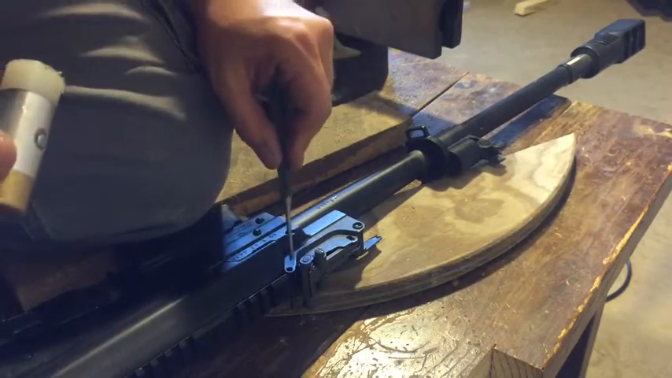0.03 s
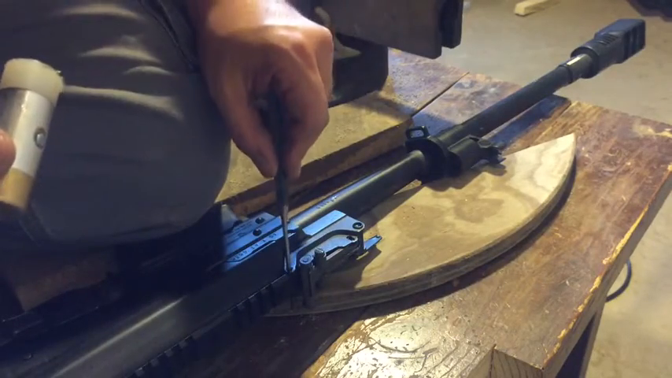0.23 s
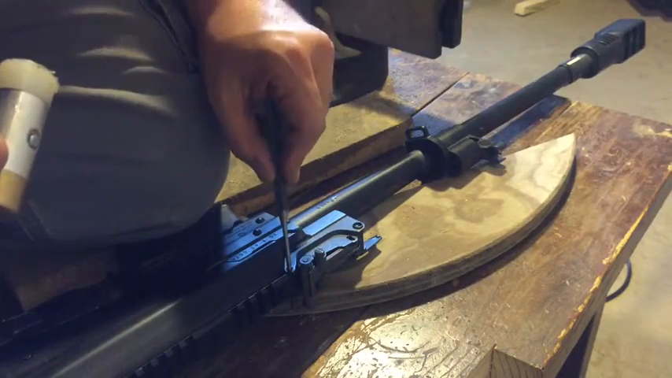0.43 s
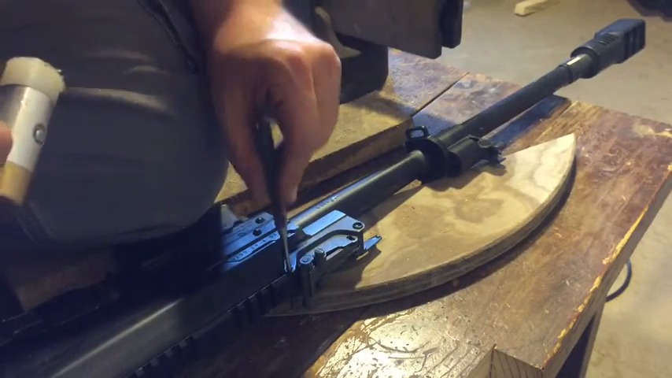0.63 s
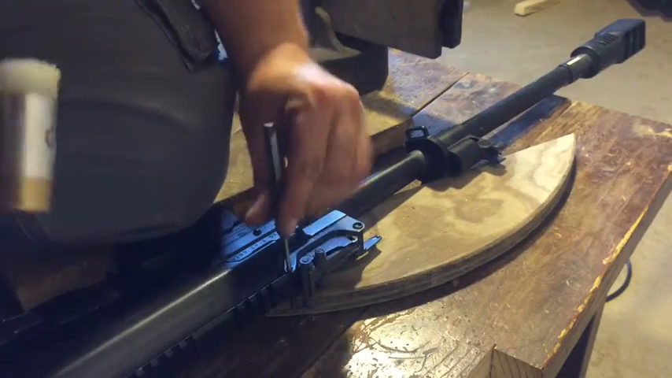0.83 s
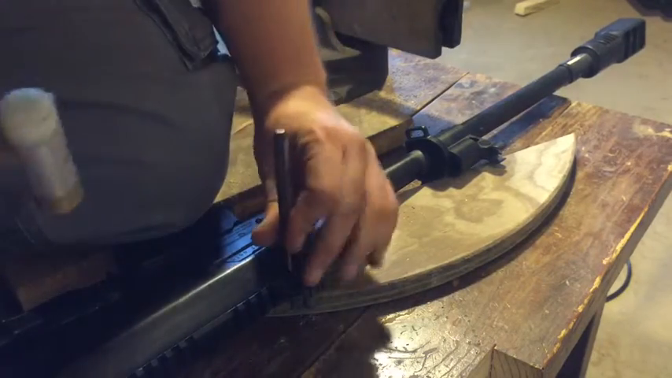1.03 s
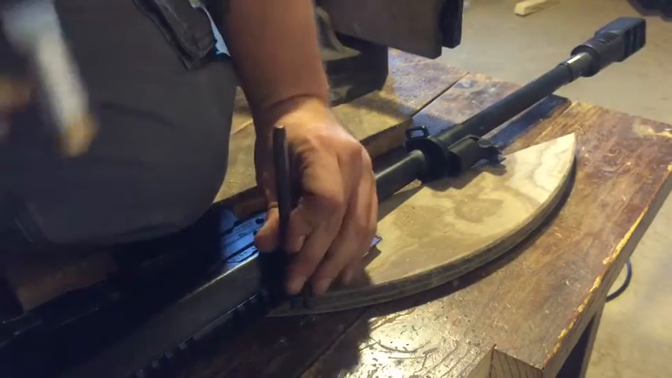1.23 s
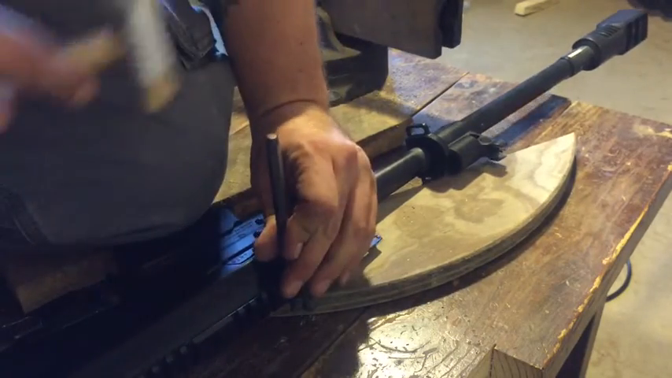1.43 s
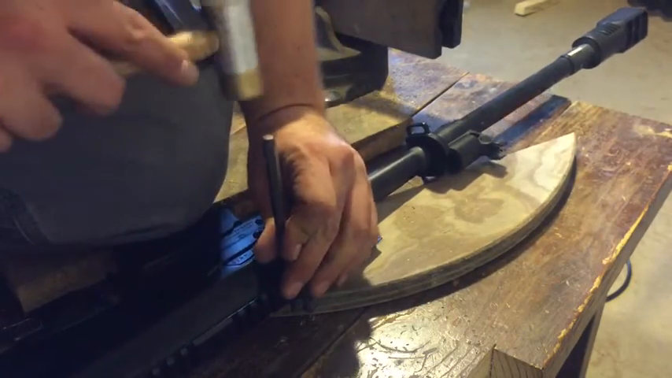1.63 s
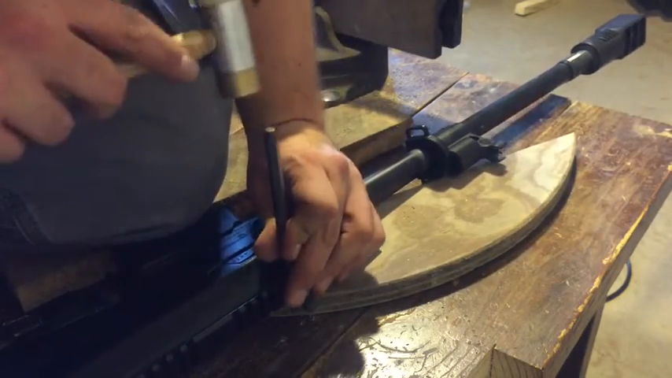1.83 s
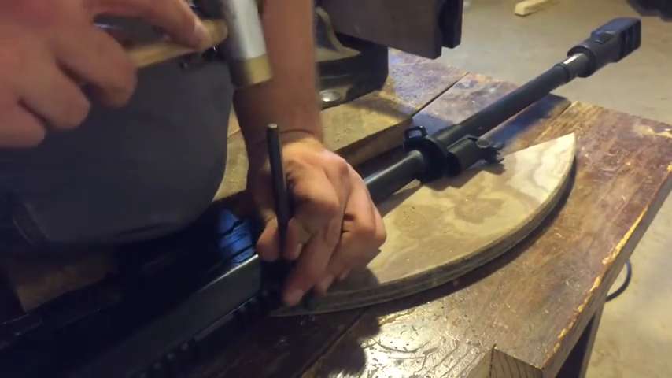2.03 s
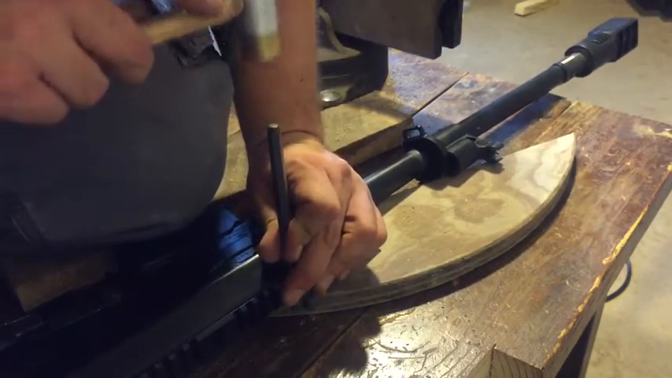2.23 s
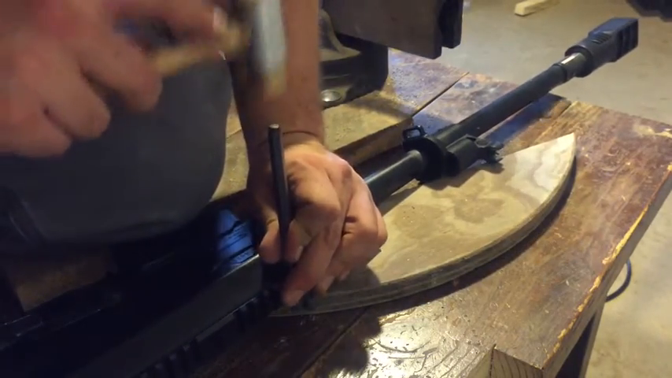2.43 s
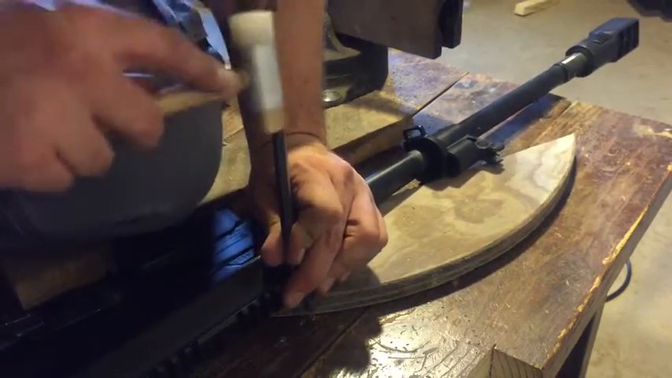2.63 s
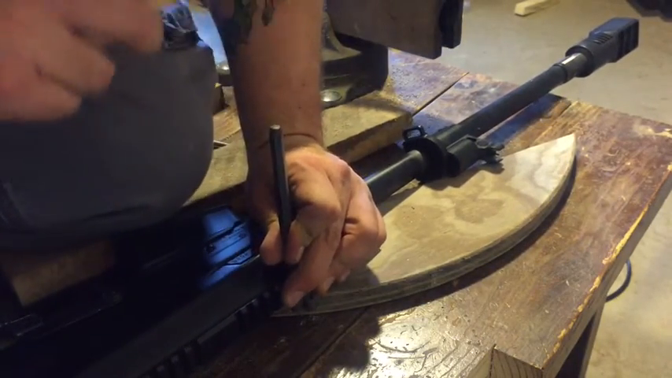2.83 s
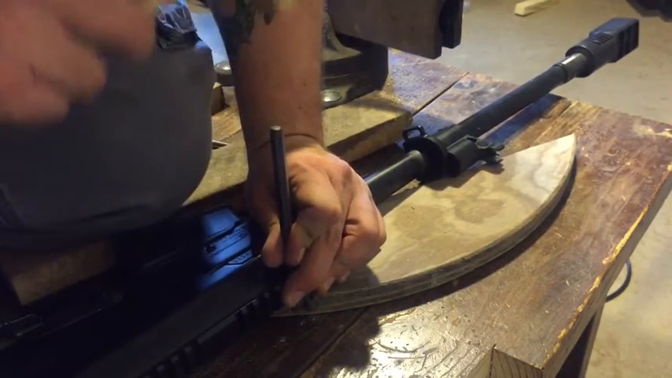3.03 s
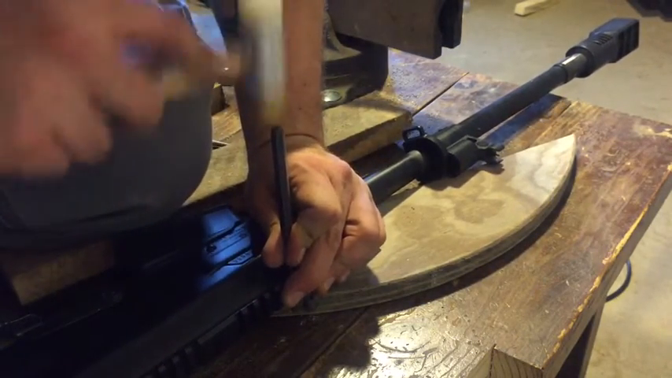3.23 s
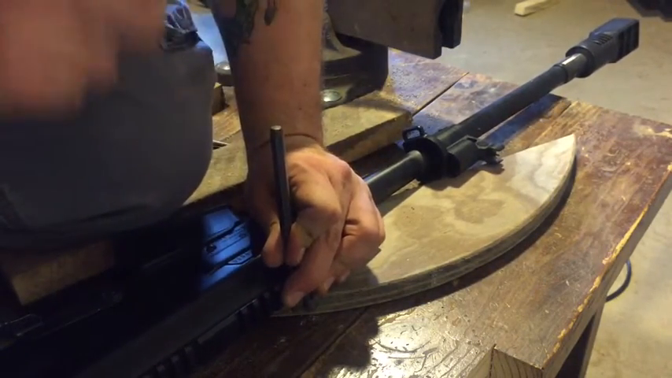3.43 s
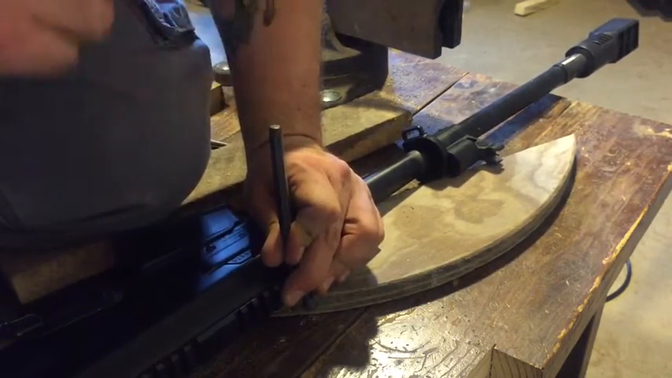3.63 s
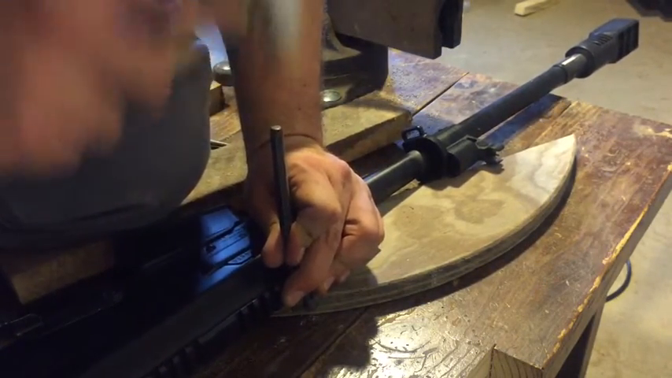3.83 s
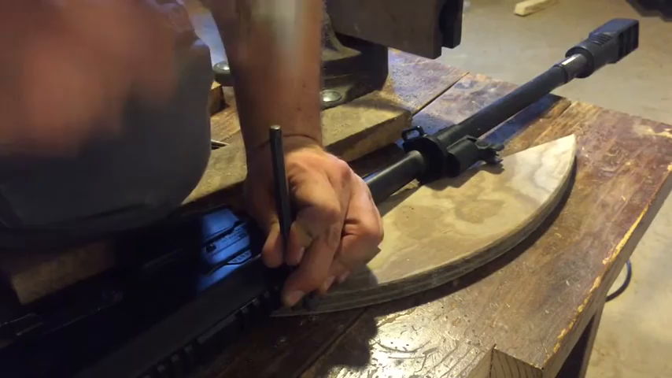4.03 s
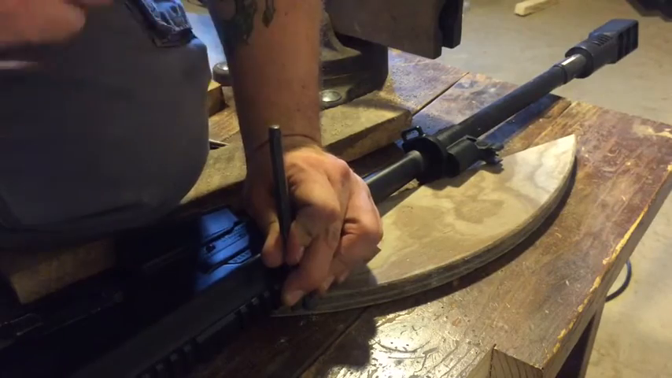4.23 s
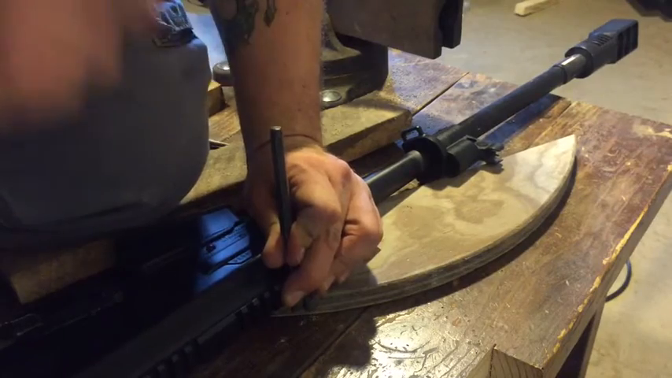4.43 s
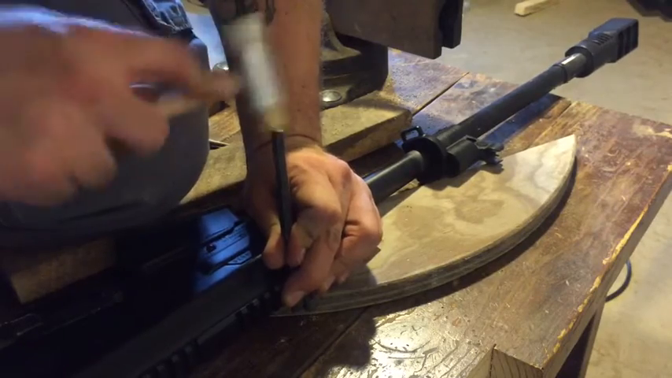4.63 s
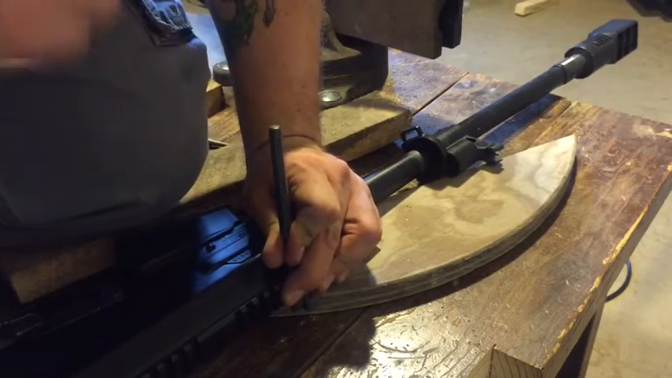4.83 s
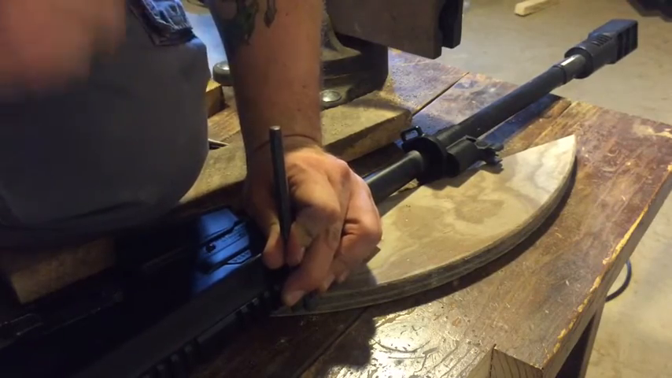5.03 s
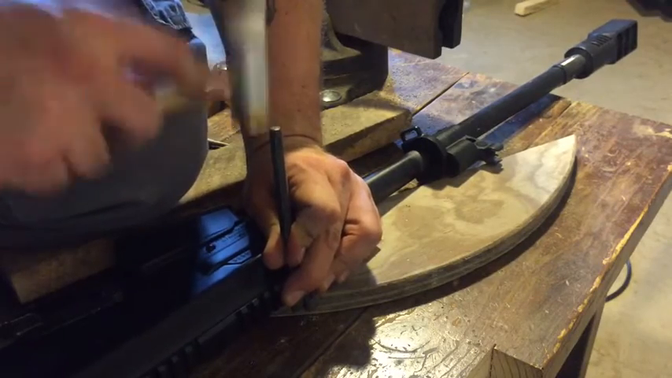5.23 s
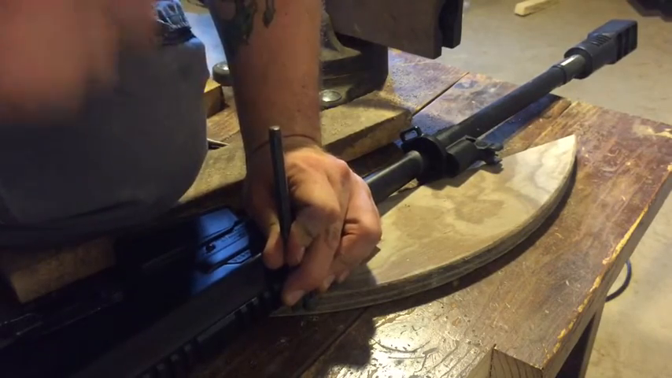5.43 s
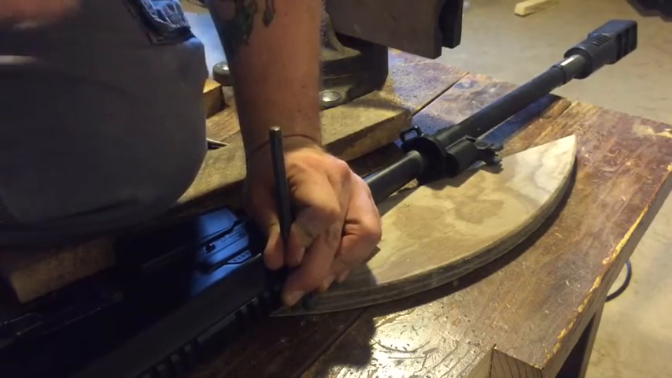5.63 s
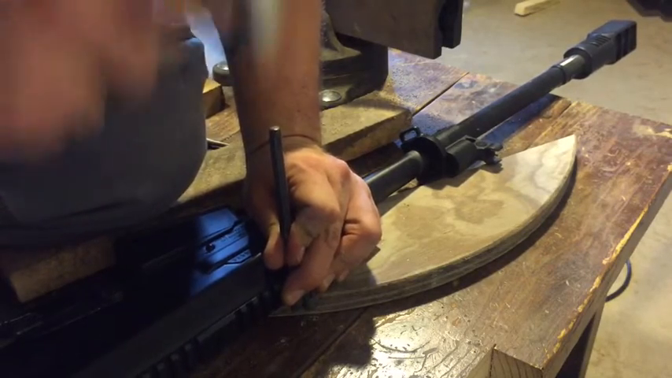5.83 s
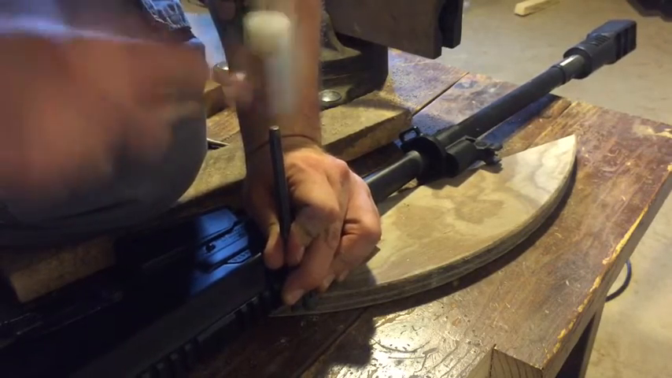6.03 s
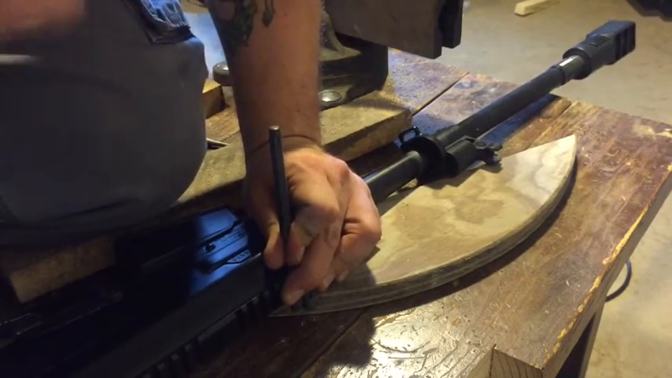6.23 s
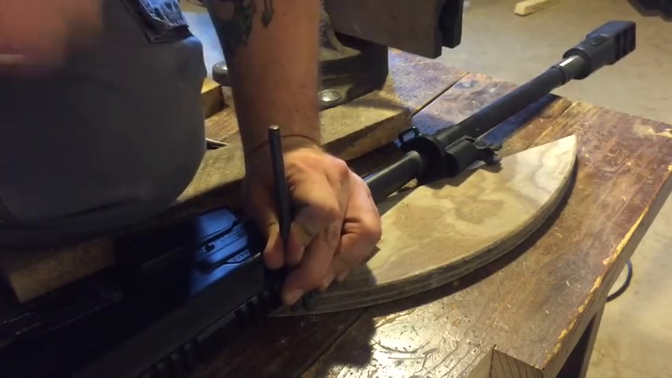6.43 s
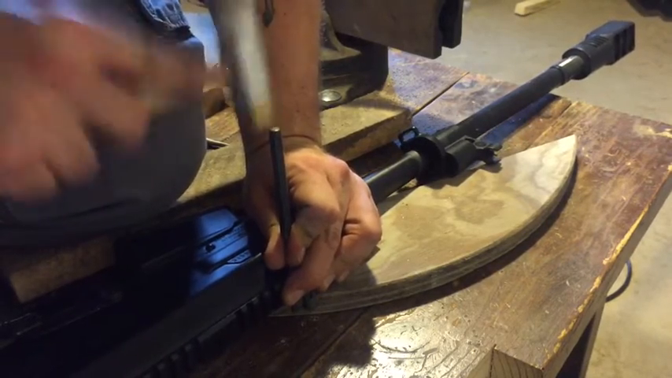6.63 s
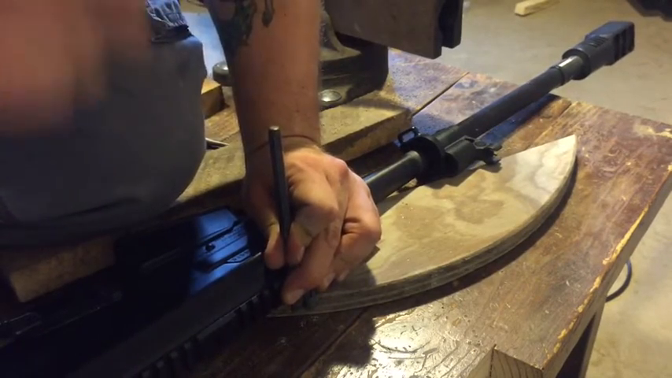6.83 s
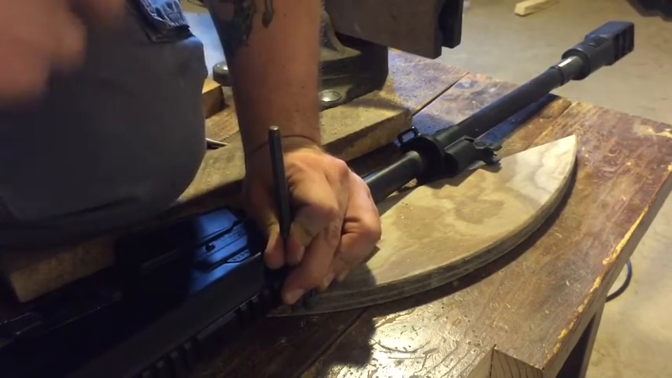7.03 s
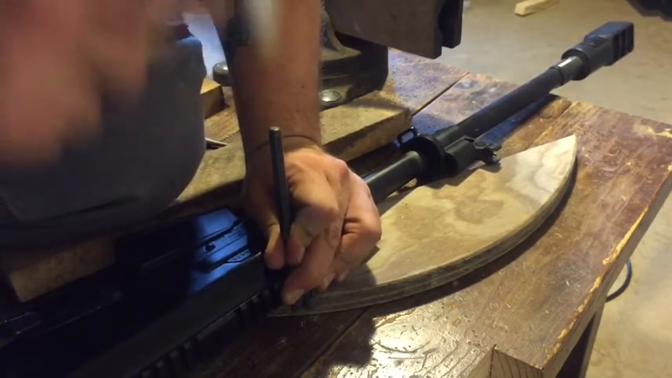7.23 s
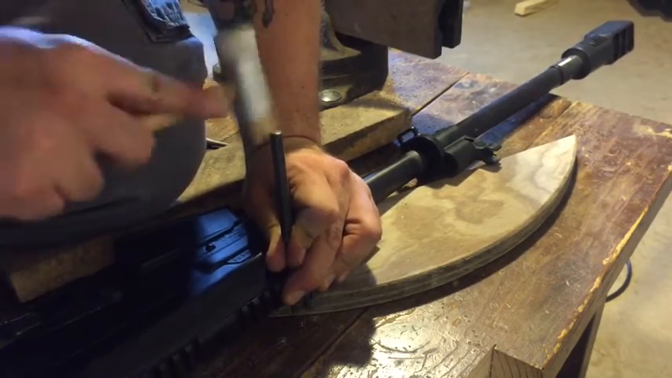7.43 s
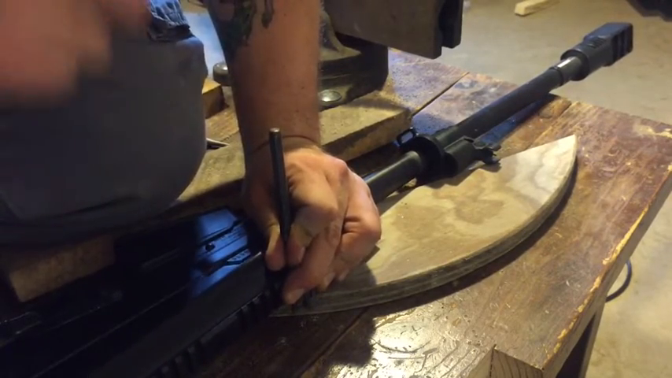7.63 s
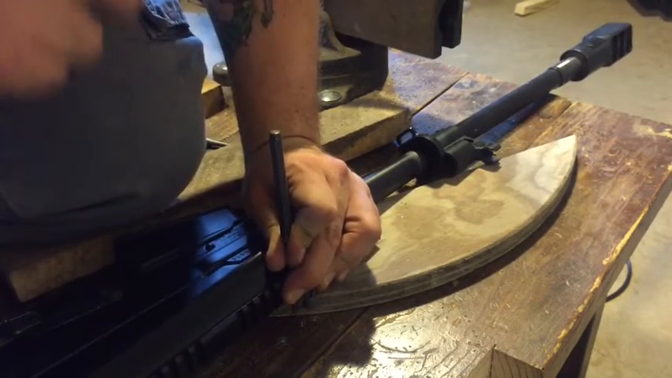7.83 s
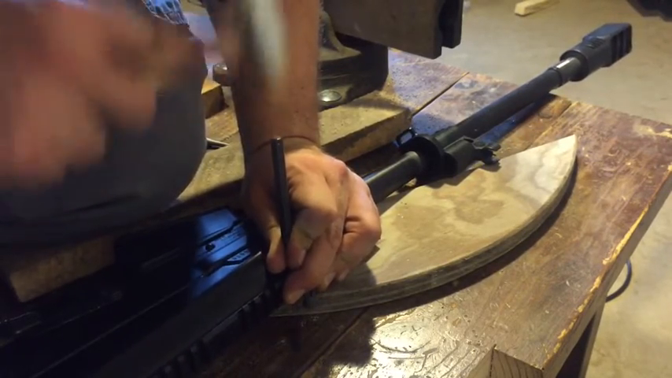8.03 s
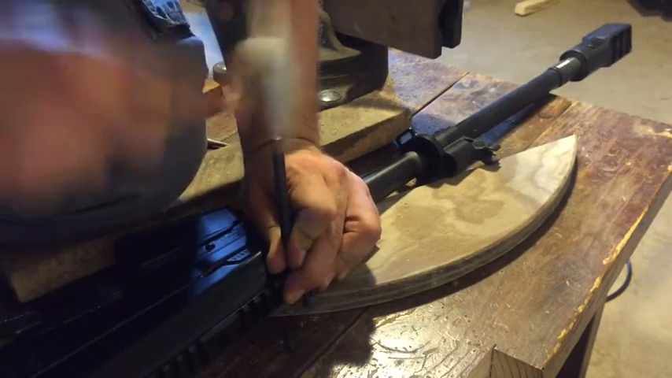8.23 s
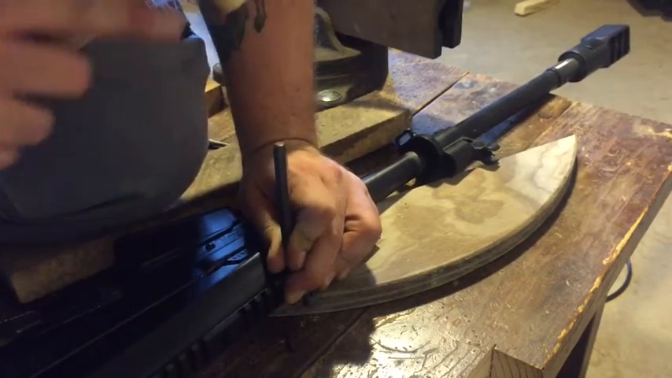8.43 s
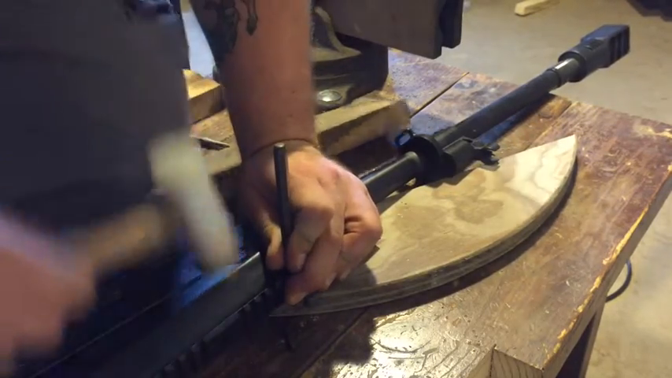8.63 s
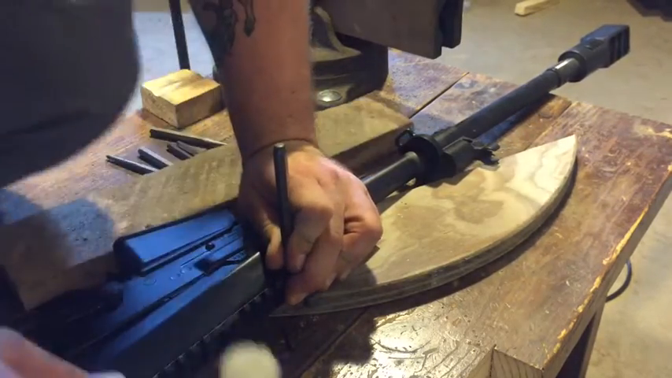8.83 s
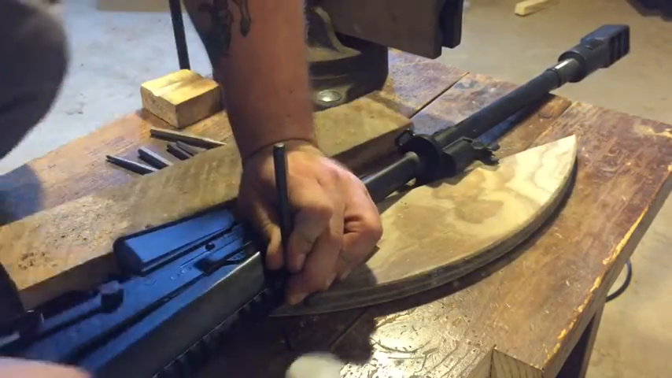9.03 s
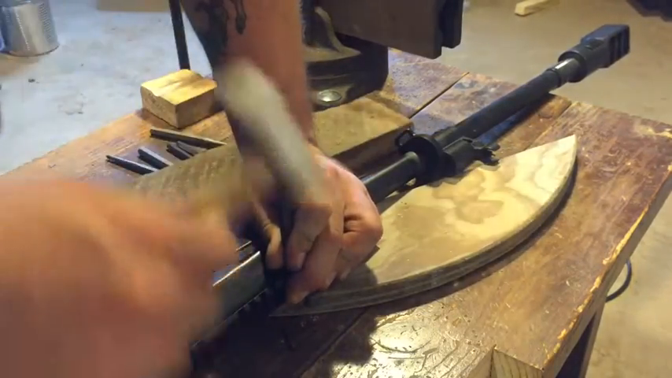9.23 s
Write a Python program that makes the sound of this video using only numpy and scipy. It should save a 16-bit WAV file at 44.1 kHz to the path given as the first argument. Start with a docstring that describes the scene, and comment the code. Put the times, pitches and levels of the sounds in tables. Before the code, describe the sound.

Close up in a small workshop, a steel punch taps and scrapes faintly on metal while it is seated. After a quiet pause, a hammer hits it hard at a steady pace, between three and four blows a second, each a bright clash with ringing steel and a bench thump. The ring dulls as the pin loosens; a double clash frees it, and a dull wooden knock follows.

```python
"""A hammer drives a steel punch onto a pin 21 times, in a steel assembly on a wooden bench in a small workshop.
Each blow clashes the steel parts, rings them and thumps the bench: noise bursts plus decaying modes.
Before the blows the punch taps, scrapes and seats (soft contacts, gritty noise); later the pin works loose.
The close microphone hears dense decaying reflections and still air, and clips the loudest peaks.
A dull knock on the wood, a burst with a fainter tail and ringing modes, ends the run."""
import sys
import numpy as np
from scipy import signal
from scipy.fft import rfft, irfft
from scipy.io import wavfile

SR = 44100
rng = np.random.default_rng(int(sys.argv[2]) if len(sys.argv) > 2 else 0)


def wrap_up_sound(samples):
    """Save the sound to the file named by the first command line argument, as 16-bit audio."""
    columns = np.atleast_2d(samples).T
    # keep every value between -1 and 1, then stretch to whole-number steps
    tamed = np.clip(columns, -1, 1)
    steps = np.round(tamed * 32767).astype(np.int16)
    wavfile.write(sys.argv[1], SR, steps)


N = 410130
AGE = np.arange(int(.8 * SR)) / SR  # seconds since a sound began


def amp(db):
    """Decibels to gain."""
    return 10 ** (np.asarray(db) / 20)


def add(track, s, sound):
    """Mix a sound into the track at a time in seconds."""
    i = int(s * SR)
    track[i:i + len(sound)] += sound[:N - i]


def lookup(points, hz):
    """Read a table on a log-frequency axis."""
    f, value = np.transpose(points)
    return np.interp(np.log(hz + 1), np.log(f), value)  # + 1 avoids log(0)


def noise(spectrum, size=len(AGE)):
    """Noise of a given colour, rms 1: white noise shaped in the frequency domain."""
    white = rfft(rng.standard_normal(size))
    y = irfft(white * amp(lookup(spectrum, np.fft.rfftfreq(size, 1 / SR))), size)
    return y / y.std()


def fade(t60):
    """Exponential decay, -60 dB after t60 seconds."""
    return amp(-60 * AGE / t60)


def burst(spectrum, t60):
    """Countless close modes struck at once; bursts of equal t60 carry equal energy."""
    y = noise(spectrum) * fade(t60)
    return y * np.sqrt(np.sum(fade(t60) ** 2) / np.sum(y ** 2))


def ring(modes, scatter_db=5.0, detune=.002):
    """Decaying sine modes; each strike shares the energy out a little differently."""
    out = 0
    draws = rng.standard_normal((len(modes), 3))
    for (hz, db, t60), (level_draw, pitch_draw, sign_draw) in zip(modes, draws):
        level = np.sign(sign_draw) * amp(db + scatter_db * level_draw)
        tone = np.sin(2 * np.pi * hz * (1 + detune * pitch_draw) * AGE)
        out = out + level * fade(t60) * tone
    return out


def octaves(hz, other_hz):
    """Distance between two pitches."""
    return abs(np.log2(hz / other_hz))


# still air of the shop, relative spectrum: f/Hz, level/dB
AIR_SPECTRUM = [(15, -41), (25, -3.5), (43, -14), (69, 4), (488, -11), (978, -11.5), (1540, -14.5),
                (2850, -14.5), (6720, -20.5), (8100, -23.5), (15000, -20)]
AIR_DB = -67.5  # rms level


def still_air():
    """Steady coloured noise: the background of the shop."""
    return amp(AIR_DB) * noise(AIR_SPECTRUM, size=N)


# ring of the loose parts under a light touch: f/Hz, level/dB, t60/s
LOOSE_PARTS = [(216.5, -2.5, 0.16), (538, -5.5, .2), (950, -5.5, 0.19), (1010, 1.5, .18), (1850, -14, .08),
               (2860, -13, 0.14)]
PARTS_DB_PER_OCTAVE = -24  # they answer less the further a contact's pitch lies from their strongest mode


def sympathy_db(hz):
    """The loose parts answer most to a pitch near their strongest mode."""
    strongest_hz = max(LOOSE_PARTS, key=lambda mode: mode[1])[0]
    return PARTS_DB_PER_OCTAVE * octaves(hz, strongest_hz)


# faint touches while the tip hunts for the pin
FIDGET_S, FIDGET_HZ = (.33, 0.7), 997  # (first s, last s), pitch
FIDGET_DB, FIDGET_SCATTER_DB = -61, 3.5  # relative level and its spread


def fidgets(count):
    """Faint touches at uneven intervals, as rows of t/s, level/dB, f/Hz."""
    slots = (np.arange(count) + rng.random(count)) / count
    times = np.interp(slots, [0, 1], FIDGET_S)
    levels = FIDGET_DB + FIDGET_SCATTER_DB * rng.standard_normal(count)
    return [(s, db, FIDGET_HZ) for s, db in zip(times, levels)]


# light taps of steel on steel: t/s, relative level/dB, pitch f/Hz
STEEL_TAPS = [(0.262, -40, 1070), (.688, -31, 1085), (0.806, -32.5, 1098), (0.823, -25, 1850),
              (1.069, -36.5, 1206), (1.235, -54.5, 1320), (1.307, -60, 1270), (2.477, -58, 1320),
              (5.063, -19.5, 1577), (5.632, -23, 1584)]
# bumps of the work on the wooden bench: t/s, relative level/dB, pitch f/Hz
BENCH_BUMPS = [(2.04, -56, 700), (2.056, -45, 1660), (2.111, -42, 1510), (2.298, -46, 1014),
               (8.779, -41.5, 330)]
# mix of each kind of contact: (tick dB, wood dB, loose parts dB before sympathy)
TAP_MIX, BUMP_MIX, FIDGET_MIX = (-15.5, -14.5, -7), (-20, 6.1, -7.5), (-14, -1.5, 4)


def contacts():
    """Every light contact with the mix of its kind; its pitch sets how the loose parts answer."""
    kinds = [(STEEL_TAPS, TAP_MIX), (BENCH_BUMPS, BUMP_MIX), (fidgets(count=6), FIDGET_MIX)]
    rows = []
    for events, (tick_db, wood_db, parts_db) in kinds:
        for s, db, hz in events:
            rows.append((s, db, hz, tick_db, wood_db, parts_db + sympathy_db(hz)))
    return rows


# modes of a light contact: f/multiple of its pitch, level/dB, t60/s
CONTACT_MODES = [(.62, -15.5, .06), (1, -1, 0.05), (1.22, -4, .04), (1.75, -14, .03)]
# clash of steel on steel, in touches and blows, relative spectrum: f/Hz, level/dB
CLASH_SPECTRUM = [(200, -31), (900, -22), (2000, -1.5), (3300, 2), (5000, -4), (6800, -0.5), (10000, -5.5),
                  (15000, -10.5)]
# thump of the wood, in touches and blows, relative spectrum: f/Hz, level/dB
WOOD_SPECTRUM = [(30, -27.5), (60, -12.5), (150, -10), (230, 6), (350, -14), (600, -9.5), (1500, -23),
                 (6000, -57)]


def handling():
    """The punch is set down and seated; loose parts click and the bench answers."""
    out = np.zeros(N)
    touch = 1 - np.exp(-AGE / 0.0019)  # a hand-held contact builds up softly
    for s, db, hz, tick_db, wood_db, parts_db in contacts():
        modes = [(hz * multiple, mode_db, t60) for multiple, mode_db, t60 in CONTACT_MODES]
        contact = ring(modes, scatter_db=0, detune=.01)
        # noise centred on the contact's pitch
        body_spectrum = [(hz / 4, -22), (hz * 0.54, -12), (hz, 0), (hz * 1.8, -7), (hz * 4, -32), (hz * 9, -50)]
        body = amp(-3.5) * burst(body_spectrum, t60=0.053)
        tick = amp(tick_db) * burst(CLASH_SPECTRUM, t60=0.033)
        wood = amp(wood_db) * burst(WOOD_SPECTRUM, t60=0.12)
        parts = amp(parts_db) * ring(LOOSE_PARTS, scatter_db=3.5)
        add(out, s, amp(db + 4.0) * touch * (contact + body + tick + wood + parts))
    return out


# reflections of the workshop walls, relative spectrum: f/Hz, level/dB
WALL_SPECTRUM = [(50, -8), (150, 1.5), (600, 0.5), (1500, -4), (3500, -3), (7000, -5), (10000, -3),
                 (15000, -1)]
# reverberation of the workshop: f/Hz, t60/s
ROOM_DECAY = [(100, 0.37), (500, 0.43), (2000, 0.32), (6500, 0.32), (10000, 0.25), (15000, 0.18)]


def workshop(x):
    """Dense reflections that lose their treble first: bands of random phase, each with its own decay."""
    hz = np.fft.rfftfreq(len(AGE), 1 / SR)
    centres = np.geomspace(60, 16000, 12)
    scatter = np.exp(2j * np.pi * rng.random(len(hz))) * amp(lookup(WALL_SPECTRUM, hz))
    response = 0
    for centre, share in zip(centres, np.eye(len(centres))):
        band = irfft(scatter * np.interp(hz, centres, share), len(AGE))
        response = response + band * fade(lookup(ROOM_DECAY, centre))
    response = response * (1 - np.exp(-(AGE / 0.0011) ** 2))  # the answer builds up over a millisecond or two
    return signal.fftconvolve(x, response)[:N]


# steel tip dragged over steel: start t/s, length/s, relative level/dB
TIP_DRAGS = [(0.332, 0.07, -65), (0.642, 0.075, -39.5), (0.796, .02, -44), (1.175, .025, -64)]
SCRAPE_ATTACK_S, SCRAPE_RELEASE_S = 0.016, 0.0078


def drags():
    """Pressure on the sliding tip: each drag builds up, holds and lets go."""
    out = np.zeros(N)
    for s, length, db in TIP_DRAGS:
        attack = np.minimum(AGE / SCRAPE_ATTACK_S, 1)
        release = np.exp(-np.maximum(AGE - length, 0) / SCRAPE_RELEASE_S)
        add(out, s, amp(db) * attack * release)
    return out


def scrape():
    """The sliding tip catches on tiny burrs, several hundred a second."""
    catches = (rng.random(N) < 700 / SR) * amp(2.2 * rng.exponential(size=N))
    grit = signal.fftconvolve(catches, fade(0.031))[:N]
    tip_spectrum = [(200, -4.5), (700, -3), (1100, 4.0), (1600, 0.5), (2800, -5.5), (5000, -8.5),
                    (9000, -12.0), (15000, -24)]
    pressure = drags()
    tip = noise(tip_spectrum, size=N)
    return amp(2) * pressure * tip * grit / np.sqrt(np.mean(grit ** 2))


# the pin works loose: t/s, looseness 0-1
PIN_LOOSENESS = [(2.7, 0.01), (5.0, 0.1), (6.1, 0.17), (6.7, 0.47), (7.25, 0.57), (7.5, 0.87), (8.35, 0.8)]


def looseness(s):
    """How far the pin has worked loose, 0-1."""
    return np.clip(np.interp(s, *np.transpose(PIN_LOOSENESS)), 0, 1)


# hammer blows: t/s, relative force level/dB, punch clack f/Hz, relative clack level/dB
HAMMER_BLOWS = [(2.7183, -1.5, 1065, 14.5), (3.009, 0.5, 1205, 2.5), (3.288, .5, 1024, 0.5),
                (3.5794, 0, 1260, 1), (3.8602, 0.5, 1130, 3), (4.1519, -0.5, 1305, 9),
                (4.4294, 0, 1010, 15.5), (4.7225, 0.5, 1237, 9.5), (5.0066, 0, 1284, 6),
                (5.2931, -0.5, 945, 7), (5.5734, 0, 1230, 3.5), (5.8614, 0, 1120, -5), (6.136, 0, 1212, 13),
                (6.4103, 0, 1140, -8.5), (6.691, 0, 1200, -2), (6.9719, -7.5, 1610, 10),
                (7.2478, 1, 984, 10.5), (7.5088, 0, 1060, 0), (7.791, .5, 1210, 1.5),
                (8.0534, -0.5, 1265, 2), (8.3364, -1.5, 1410, -3)]
# how each part of a blow responds: (dB with the pin tight, dB per dB of force, dB gained with the pin loose)
CLASH_LAW, THUMP_LAW, CLANK_LAW = (-2.52, 0.9, -1.6), (-1.7, 1.9, 5.4), (1.8, 1.05, -8.5)
STEEL_LAW, BRIGHT_LAW, LOW_LAW = (-0.74, .95, -5.5), (-0.4, 2.5, -11), (26.7, 1.6, -27.5)
GRIP_DB, GRIP_RELAX_S = -14, 0.23  # the tight first grip damps the bright ring, then relaxes
FREED_DB = -11  # the last blow frees the pin and thumps the bench far less
LOW_DB_PER_OCTAVE = -43  # the low ring answers less the further the clack's pitch lies from it
# two single modes of the steel: (f/Hz, level/dB, t60/s)
BRIGHT_RING, LOW_RING = (3851, -12.5, 0.16), (1535, -37.5, 0.4)


def blows():
    """Force and looseness share out each blow: a tight pin rings the steel, a loose one thumps the bench."""
    rows = []
    laws = [CLASH_LAW, THUMP_LAW, CLANK_LAW, STEEL_LAW, BRIGHT_LAW, LOW_LAW]
    first_s, last_s = HAMMER_BLOWS[0][0], HAMMER_BLOWS[-1][0]
    for s, force_db, clack_hz, clack_db in HAMMER_BLOWS:
        levels = np.dot(laws, [1, force_db, looseness(s)])
        clash_db, thump_db, clank_db, steel_db, bright_db, low_db = levels
        thump_db += FREED_DB * (s == last_s)
        bright_db += GRIP_DB * np.exp((first_s - s) / GRIP_RELAX_S)
        low_db += LOW_DB_PER_OCTAVE * octaves(clack_hz, LOW_RING[0])
        rows.append((s, clash_db, thump_db, clank_db, steel_db, bright_db, low_db, clack_hz, clack_db))
    return rows


# clank of the struck work, relative spectrum: f/Hz, level/dB
CLANK_SPECTRUM = [(100, -3), (300, -4), (550, -2.5), (800, -1), (1200, 4.5), (1700, -0.5), (2100, -1.5),
                  (3300, -7), (8000, -21.5)]


def hammer():
    """Each blow slams the punch home, and the parts clash again as they rebound."""
    out = np.zeros(N)
    rebounds = rng.uniform(0.0018, .005, len(HAMMER_BLOWS))  # s after the blow
    for (s, clash_db, thump_db, clank_db, _, _, _, clack_hz, clack_db), rebound in zip(blows(), rebounds):
        clash = amp(clash_db + 5.5) * burst(CLASH_SPECTRUM, t60=0.029)
        clank = amp(clank_db - 4.5) * burst(CLANK_SPECTRUM, t60=0.058)
        clack = amp(clack_db - 12.0) * ring([(clack_hz, 0, .025)], scatter_db=1.5)
        thump = amp(thump_db - 15.5) * burst(WOOD_SPECTRUM, t60=.09)
        add(out, s, clash + clank + clack + thump)
        add(out, s + rebound, amp(clash_db - 8.0) * burst(CLASH_SPECTRUM, t60=0.022))
    return out


KNOCK_S = 8.818  # the closing knock on the wood
SHIMMER_T60_S = (3, 1.0)  # (with the pin tight, with it loose)
CLACK_PARTS_DB = -37.5  # how much of the punch's clack shakes the loose parts
# modes of the steel assembly: f/Hz, level/dB, t60/s
STEEL_MODES = [(1110, -17.5, .08), (1263, -15, .08), (1963, -22.5, 0.2), (2066, -20.5, 0.19),
               (2510, -24.5, 0.25), (2420, -10.5, 0.07), (3030, -19, 0.15), (3360, -25, 0.12),
               (3430, -16, 0.077), (4500, -38.5, 0.48), (4656, -13.5, 0.067), (6170, -30, 0.35),
               (6570, -31.5, .17)]
# fine shimmer of the steel, relative spectrum: f/Hz, level/dB
SHIMMER_SPECTRUM = [(150, -9.5), (600, 6), (1500, -1), (3500, 0.5), (5000, -9.5), (6600, -6), (9000, -15),
                    (15000, -27.5)]
# modes of the bench: f/Hz, level/dB, t60/s
BENCH_MODES = [(67, -31, 0.041), (109, -24, 0.077), (145, -20, 0.29), (203.1, -14.5, 0.11),
               (223, -30.5, 0.35), (242.8, -19, 0.16), (284.6, -17.5, 0.14), (354.5, -27.5, 0.21),
               (510, -38.5, 0.52)]
# modes of the knocked wood: f/Hz, level/dB, t60/s
BOARD_MODES = [(268.4, 3, 0.21), (303.5, -5, 0.32), (460, 4, 0.18), (559, -7.5, .16), (641, -9, 0.2),
               (902, -6, 0.16), (1030, -9.5, 0.2), (1860, -5, 0.32), (2300, -12, .22)]


def ringing():
    """What outlasts the contact, heard straight from the work: steel modes, their fine shimmer and the wood."""
    out = np.zeros(N)
    for s, _, thump_db, clank_db, steel_db, bright_db, low_db, clack_hz, clack_db in blows():
        steel = amp(steel_db) * ring(STEEL_MODES, scatter_db=2, detune=0.0027)
        shimmer_t60 = np.interp(looseness(s), [0, 1], SHIMMER_T60_S)
        # the shimmer grows a little faster than the clank
        shimmer = amp(1.1 * clank_db - 46.0) * burst(SHIMMER_SPECTRUM, t60=shimmer_t60)
        bright = amp(bright_db) * ring([BRIGHT_RING], scatter_db=1.9, detune=.0004)
        low = amp(low_db) * ring([LOW_RING], scatter_db=0.5, detune=.0004)
        bench = amp(thump_db) * ring(BENCH_MODES, scatter_db=1.5, detune=.01)
        parts_db = CLACK_PARTS_DB + clack_db + sympathy_db(clack_hz)
        parts = amp(parts_db) * ring(LOOSE_PARTS, scatter_db=2.0)
        add(out, s, steel + shimmer + bright + low + bench + parts)
    add(out, KNOCK_S, amp(-16) * ring(BOARD_MODES, scatter_db=2))
    return out


def jolt():
    """One blow comes with a deep thud close to the microphone: three short low modes."""
    out = np.zeros(N)
    add(out, 5.2945, ring([(54, -2, .085), (80, 0, .05), (150, 0, .03)], scatter_db=.5))
    return out


# ring of the freed pin: f/Hz, level/dB, t60/s
PIN_MODES = [(1400, -10, .03), (2765, -6, 0.038)]
BREAKOUT_LAG_S, BREAKOUT_DB = .007, -1  # the freed pin shoots on and strikes the steel below


def breakout():
    """The last blow drives the pin free: a second clash with a short ring."""
    out = np.zeros(N)
    clash = amp(-4) * burst(CLASH_SPECTRUM, t60=0.025)
    pin = ring(PIN_MODES, scatter_db=0.5)
    add(out, HAMMER_BLOWS[-1][0] + BREAKOUT_LAG_S, amp(BREAKOUT_DB) * (clash + pin))
    return out


# dull knock on the wood, relative spectrum: f/Hz, level/dB
KNOCK_SPECTRUM = [(40, -29), (150, -10.5), (290, -0.5), (420, -1), (620, 3), (950, -3.5), (1400, -5),
                  (2000, -6), (2800, -13), (4800, -26), (5400, -42), (15000, -69)]


def knock():
    """One dull blow on wood, which rattles on briefly: a short burst over a fainter, longer one."""
    out = np.zeros(N)
    swell = 1 - np.exp(-AGE / 0.00069)  # the wood gives way, so the onset is soft
    blow = amp(-2.5) * burst(KNOCK_SPECTRUM, t60=0.067)
    rattle = amp(-20.5) * burst(KNOCK_SPECTRUM, t60=0.43)
    add(out, KNOCK_S, swell * (blow + rattle))
    return out


def scene():
    """Everything on the bench, its reflections and the still air of the shop."""
    strikes = hammer() + breakout() + knock()
    touches = handling() + scrape()
    reflections = workshop(amp(5.5) * (strikes + touches))
    direct = strikes + touches + ringing() + jolt()
    return (direct + reflections + still_air())[None]


def record(dry):
    """The close microphone clips the loudest peaks; then the deepest bass and the top are cut."""
    clipped = np.clip(dry, -.95, .95)
    bass_cut = signal.butter(2, 32, "high", fs=SR, output="sos")
    top_cut = signal.ellip(10, .2, 90, 15500, fs=SR, output="sos")
    thinned = signal.sosfilt(bass_cut, clipped)
    return signal.sosfilt(top_cut, thinned)


dry = scene()
out = record(dry)
wrap_up_sound(out)
```